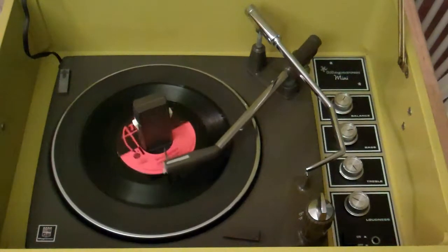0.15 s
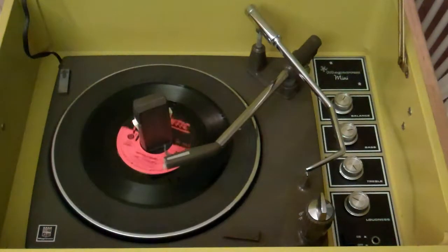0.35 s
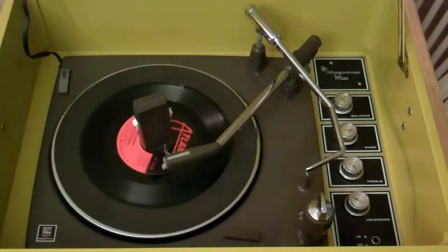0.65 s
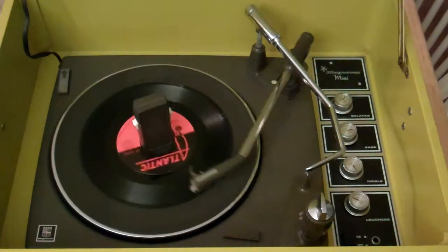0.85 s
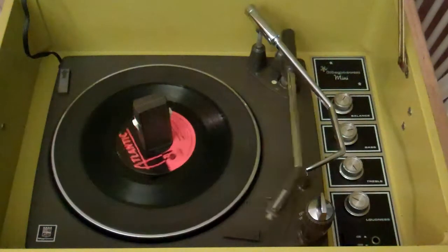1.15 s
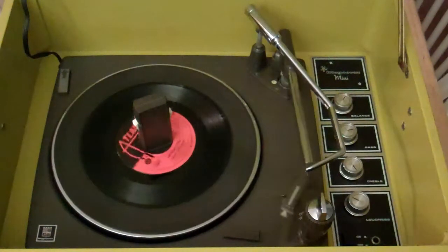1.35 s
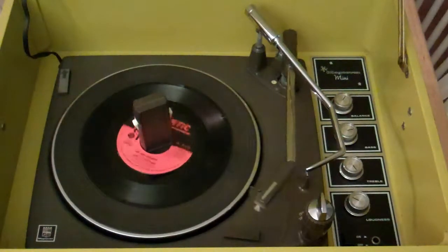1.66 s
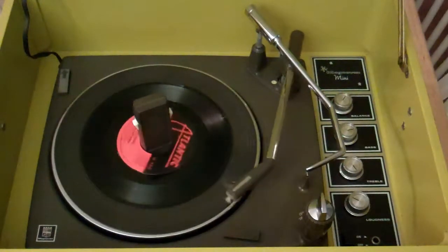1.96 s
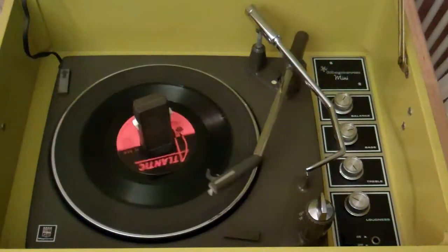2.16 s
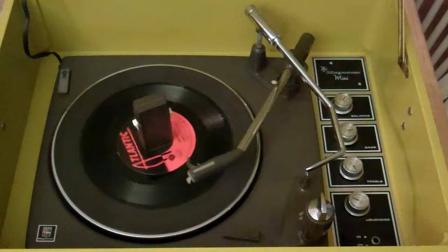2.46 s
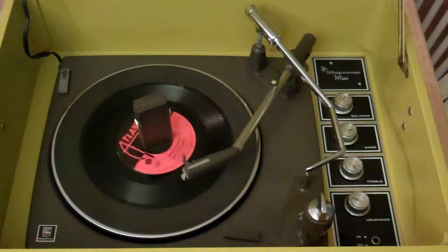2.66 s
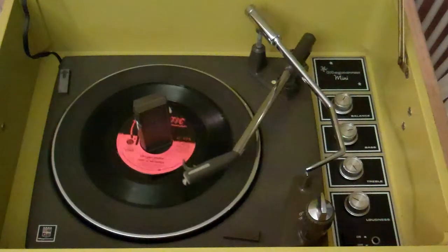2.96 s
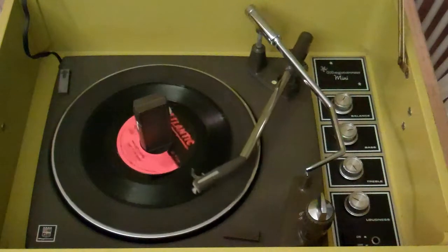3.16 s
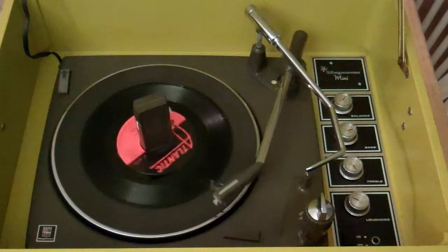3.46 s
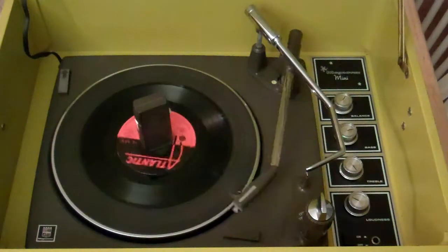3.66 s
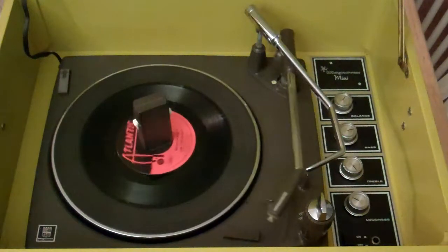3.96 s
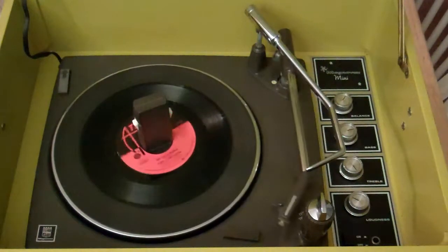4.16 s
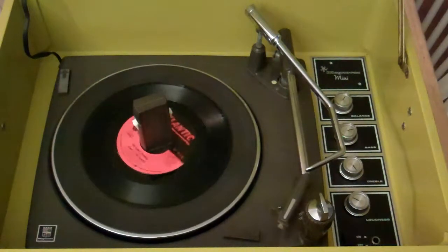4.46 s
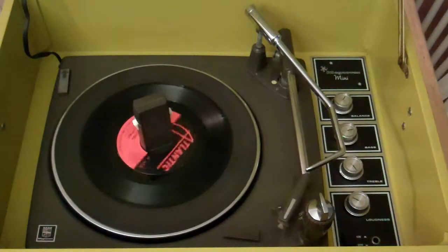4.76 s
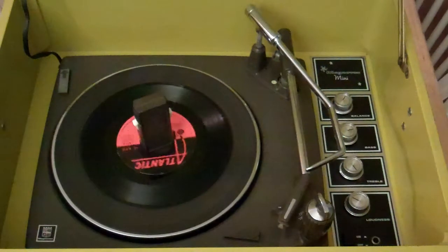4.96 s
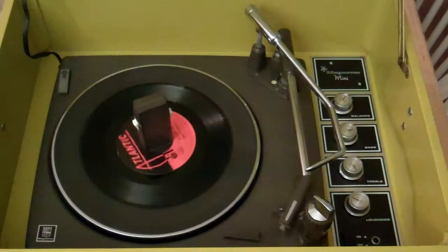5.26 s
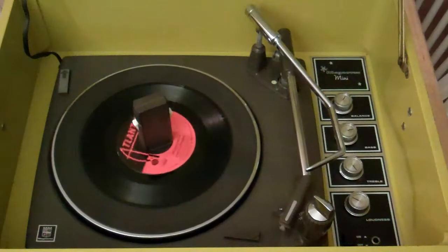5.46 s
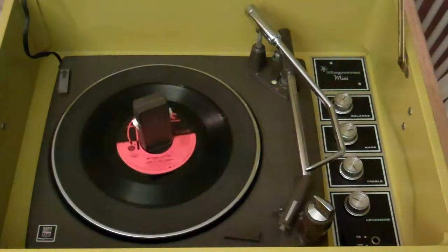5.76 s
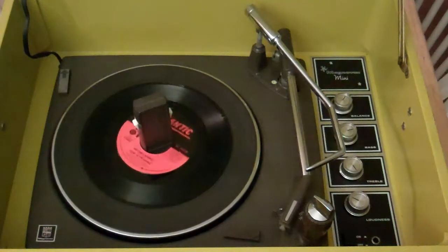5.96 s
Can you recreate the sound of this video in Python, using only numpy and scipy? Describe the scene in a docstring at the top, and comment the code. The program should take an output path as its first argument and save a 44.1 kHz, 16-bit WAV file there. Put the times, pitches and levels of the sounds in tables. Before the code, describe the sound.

Sharp mechanical clicks, soft bumps and a brief spring ring from a small record player's automatic arm, close up with light hiss.

```python
"""The changer of a small record player lifts its arm, swings it about and drops it on the rest.
Levers and pawls click under the steel deck, a spring lever rings, the cam bumps and the open case answers.
The motor hums until the switch trips, then the platter coasts with a soft rush.
Heard from close by on a camera's stereo microphone, which hisses and whines. The clicks sit to the left;
after five of the loud ones the background sinks and climbs back."""
import sys
import numpy as np
from scipy import signal
from scipy.fft import rfft, irfft, next_fast_len
from scipy.io import wavfile
from scipy.ndimage import map_coordinates

SR = 44100
rng = np.random.default_rng(int(sys.argv[2]) if len(sys.argv) > 2 else 0)


def inscribe(sig):
    """Save sig as 16-bit PCM at rate SR to the path in sys.argv[1].

    A 1-D sig is mono; a 2-D sig holds one channel per row.
    Samples are clipped to [-1, 1] before scaling.
    """
    pcm = np.round(np.clip(np.atleast_2d(sig).T, -1, 1) * 32767)
    wavfile.write(sys.argv[1], SR, pcm.astype(np.int16))


N = 269927


def amp(db):
    """Decibels as an amplitude factor."""
    return 10 ** (np.asarray(db) / 20)


def curve(points):
    """A function of frequency that joins (Hz, value) points on a log axis."""
    freqs, values = np.transpose(points)
    return lambda hz: np.interp(np.log(hz + 1), np.log(freqs + 1), values)


def wobble(rate):
    """A smooth random curve, rate knots a second."""
    return map_coordinates(rng.standard_normal(int(N * rate / SR) + 4), [np.arange(N) * rate / SR])


def filtered(x, response):
    """x shaped by a gain that depends on frequency."""
    n = x.shape[-1]
    size = next_fast_len(n + 8192)
    return irfft(rfft(x, size) * response(np.fft.rfftfreq(size, 1 / SR)), size)[..., :n]


def stereo_noise(n, spectrum_db, likeness, left_db):
    """Noise with mid rms 1, from spectrum, left-right likeness and balance as functions of frequency."""
    def mid_side_gains(hz):
        angle = np.arccos(np.clip(likeness(hz), -1, 1)) / 2
        return amp(spectrum_db(hz)) * [np.cos(angle), np.sin(angle)]

    mid, side = filtered(rng.standard_normal((2, n)), mid_side_gains)
    both = np.array([mid + side, mid - side])
    both = filtered(both, lambda hz: amp([left_db(hz) / 2, -left_db(hz) / 2]))
    return both / np.std(both.mean(0))


# The microphone's hiss. Each row: frequency in Hz, spectral level in dB.
HISS_SPECTRUM = [(18, -44), (30, 3), (143, -5.5), (180, -2.5), (238, -2.5), (417, -3), (474, -4),
                 (525, -3.5), (3400, -9), (3860, -9), (6770, -14), (10200, -21), (11900, -32), (13500, -51)]
# Its width. Each row: frequency in Hz, left-right likeness from 0 to 1.
HISS_LIKENESS = [(60, 0.08), (180, 0.33), (540, 0.22), (1630, 0.15), (4900, 0.088), (14700, 0.12)]
# Its balance. Each row: frequency in Hz, left over right in dB.
HISS_BALANCE = [(60, 0), (240, 0.5), (940, 1), (3720, 0.5), (14700, 3.5)]

def microphone():
    """Smooth, wide hiss and the thin whine of the camera's sensor, which starts afresh each frame."""
    whine_hz, frames_per_s = 7866, 29.97
    hiss = stereo_noise(N, curve(HISS_SPECTRUM), curve(HISS_LIKENESS), curve(HISS_BALANCE))
    frame_time = np.arange(N) / SR % (1 / frames_per_s)
    whine = np.sin(2 * np.pi * whine_hz * frame_time)
    return amp(3.5) * hiss + amp([[-9.4], [-8.4]]) * whine


# Idler and platter turning. Each row: frequency in Hz, spectral level in dB.
WHIRR_SPECTRUM = [(40, -14), (90, 5.5), (130, -2.5), (250, -0.5), (420, 0.5), (700, -13.5), (1200, -10.5),
                  (2500, -12), (5000, -46.5)]
# The motor's windings. Each row: frequency in Hz, level over the background in dB.
HUM_TONES = [(119.5, -8.5), (1105, -6.5), (1226, -14), (2386, -15)]

def motor(switch_off_s=4.45, decay_s=0.06):
    """An unevenly swelling whirr and a wavering hum, both dying quickly once the switch trips."""
    t = np.arange(N) / SR
    whirr = stereo_noise(N, curve(WHIRR_SPECTRUM), lambda hz: 0.75 + 0 * hz, lambda hz: 0.4 + 0 * hz)
    swells = amp(-5.5 + 1.7 * wobble(8.6) + 2.6 * wobble(29.77))
    hum = np.zeros(N)
    for hz, db in HUM_TONES:
        level = np.sqrt(2) * amp(db + 1.3 * wobble(5.8))
        drift = np.cumsum(2.5 * wobble(9)) / SR
        hum += level * np.sin(2 * np.pi * (hz * t + drift))
    running = np.exp(-np.maximum(t - switch_off_s, 0) / decay_s)
    return running * (swells * whirr + hum)


# Dips after loud clicks. Each row: start in seconds, depth in dB, hold in seconds, slow share from 0 to 1.
BACKGROUND_DIPS = [(0, 10.5, 0.081, 0.61), (2.91, 18.5, 0.013, 0.4), (4.21, 19, 0.016, 0.33),
                   (4.49, 9, 0.029, 0.13), (5.02, 17.5, 0.023, 0.44)]

def background_gain(resting_db=-62.5, sink_s=0.13, quick_s=0.081, slow_s=0.92):
    """In each dip the background sinks, stays down, then returns quickly at first and slowly after."""
    level_db = np.full(N, resting_db)
    for start, depth_db, hold_s, slow_share in BACKGROUND_DIPS:
        t = np.arange(N) / SR - start
        sinking = np.sin(np.pi / 2 * np.clip(t / sink_s, 0, 1))
        back = np.maximum(t - sink_s - hold_s, 0)
        remaining = (1 - slow_share) * np.exp(-back / quick_s) + slow_share * np.exp(-back / slow_s)
        level_db -= depth_db * sinking * remaining
    return amp(level_db)


# Width of rubs and clicks at the microphone. Each row: frequency in Hz, left-right likeness from 0 to 1.
MECHANISM_LIKENESS = [(120, .6), (300, 1), (2000, 0.97), (4000, 0.89), (7400, 0.58), (10000, 0.52),
                      (12000, .05)]
# Lean of rubs, rings and clicks. Each row: frequency in Hz, left over right in dB per unit of lean.
MECHANISM_LEAN = [(300, 0.1), (2000, 0.2), (4500, 0.47), (8500, 2), (10500, 4), (12000, -0.5)]
# Parts sliding on each other. Each row: frequency in Hz, spectral level in dB.
FRICTION_SPECTRUM = [(100, -11), (250, -2), (1000, -3), (3000, -7.5), (6000, -11.5), (11000, -15),
                     (13000, -60)]

def friction():
    """A grainy rub, slightly left of centre."""
    noise = stereo_noise(N, curve(FRICTION_SPECTRUM), curve(MECHANISM_LIKENESS), curve(MECHANISM_LEAN))
    return amp(2.1 * wobble(150)) * noise


def platter_coast(start_s=5.3, end_s=5.87):
    """A soft rub sets in, then fades with the platter's speed."""
    t = np.arange(N) / SR
    onset = np.clip((t - start_s) / 0.09, 0, 1)
    speed = np.clip((end_s - t) / (end_s - start_s), 0, 1)
    return amp(3.7) * onset * np.sqrt(speed) * friction()


def lever_drag(trip_s=5.014, swell_s=0.07, end_db=-56.5):
    """A lever rubs ever louder until it trips."""
    t = np.arange(N) / SR - trip_s
    return amp(end_db) * np.exp(np.minimum(t, 0) / swell_s) * (t < 0) * friction()


# The space inside the player's case. Each row: frequency in Hz, time to fall 60 dB in seconds.
CASE_DECAY = [(200, 0.27), (2000, 0.25), (10000, 0.19)]

def case_reverb(x):
    """The open case answers briefly, each frequency dying at its own speed."""
    hz, t, spectra = signal.stft(rng.standard_normal((2, SR // 4)), SR, nperseg=256)
    t60 = curve(CASE_DECAY)(hz)[:, None]
    tail = signal.istft(spectra * amp(-60 * t / t60), SR, nperseg=256)[1]
    delayed = np.pad(x, ((0, 0), (200, 0)))
    return signal.fftconvolve(delayed, tail / np.linalg.norm(tail[0]), axes=1)[:, :N]


# Cam bumps and thuds down in the deck. Each row: start in seconds, relative level in dB, pitch in Hz.
CAM_BUMPS = [(0, -49, 150), (0.212, -61, 90), (0.906, -59, 98), (1.47, -53, 96.9), (1.642, -54, 100),
             (2.06, -54.5, 92), (2.238, -58, 107), (2.543, -55, 92.5), (2.749, -59, 113), (2.905, -57, 132),
             (3.234, -62, 91.5), (3.406, -61, 94.2), (3.797, -57.5, 86.5), (4.205, -65.5, 90),
             (5.005, -62, 120)]

def cam(rise_s=0.0033, t60=0.11):
    """Each bump is a soft low push of a few cycles."""
    out, t = np.zeros(N + SR), np.arange(SR // 5) / SR
    envelope = (1 - np.exp(-t / rise_s)) * amp(-60 * t / t60)
    for start, db, hz in CAM_BUMPS:
        out[round(start * SR):][:len(t)] += amp(db + 5) * envelope * np.sin(2 * np.pi * hz * t)
    return out[:N]


# The steel spring lever. Each row: mode frequency in Hz, relative level in dB, 60 dB decay in seconds.
SPRING_MODES = [(700, -4, .06), (1039, -10, .16), (1211, -6, .18), (1570, 3, .06), (2369, -9, .13),
                (3112, -13, .2), (4000, -24, .55), (4054, 8, .07), (4040, -16, .45), (5375, -17, .3),
                (5426, -9, .3), (6944, -12, .38), (6990, -15, .2), (7407, -14, .22), (9776, -16, .18),
                (10650, -19, .18)]
# The arm's tube. Each row: mode frequency in Hz, relative level in dB, 60 dB decay in seconds.
ARM_MODES = [(490, -7, .14), (875, -8, .2), (2536, -10, .08), (4759, 2, .09), (6977, -2, .13),
             (7050, -6, .1), (7429, -8, .08), (9830, 2, .07)]

def struck_part(modes, start_s, gain_db, rise_s=0.0018, lean=2.4):
    """The modes build up just after the blow; close pairs beat and loose joints roughen the ring."""
    t = np.maximum(np.arange(N) / SR - start_s, 0)
    ring = np.zeros((2, N))
    for hz, db, t60 in modes:
        left_db = lean * curve(MECHANISM_LEAN)(hz)
        envelope = amp(db + 3.3 * wobble(70) - 60 * t / t60)
        ring += amp([[left_db / 2], [-left_db / 2]]) * envelope * np.sin(2 * np.pi * hz * t)
    return amp(gain_db) * (1 - np.exp(-t / rise_s)) * ring


# The bare crack of a contact. Each row: frequency in Hz, spectral level in dB.
CRACK_SPECTRUM = [(110, -33.5), (240, 2.5), (650, 0), (1200, 2.5), (2600, 2.5), (5000, 3), (7000, 2),
                  (10200, -3), (11300, -11), (12500, -13.5), (14000, -25.5), (15300, -50.5)]
# The steel deck, heard in every click. Each row: centre in Hz, half-width in Hz, lift in dB.
DECK_RESONANCES = [(403, 68, 5.5), (660, 45, 7.5), (835, 48, 2), (1142, 63, 6), (1976, 76, 2.5),
                   (2694, 100, 4.5), (3920, 250, 3.5), (4700, 120, 0), (7000, 210, 4), (7590, 250, 3.5),
                   (9180, 450, 3)]

def crack(n, body_db, edge_db, tone_hz, lift_db):
    """The noise of one click, dull or sharp, coloured by the deck and a resonance of the struck part."""
    shelves = [(1000, body_db + 6.5), (1550, 0.13 * body_db), (2700, 0.013), (4600, 0.011),
               (5700, edge_db)]
    resonances = [*DECK_RESONANCES, (tone_hz, 75 + 0.025 * tone_hz, lift_db)]

    def spectrum_db(hz):
        peaks = sum(db / (1 + ((hz - centre) / width) ** 2) for centre, width, db in resonances)
        return curve(CRACK_SPECTRUM)(hz) + curve(shelves)(hz) + peaks

    lean = 3.5 + 0.26 * edge_db  # sharp clicks lean further left
    return stereo_noise(n, spectrum_db, curve(MECHANISM_LIKENESS),
                        lambda hz: lean * curve(MECHANISM_LEAN)(hz))


# Levers and pawls, close to the microphone. Each row: start in seconds, relative level, low body and
# treble edge in dB, rise in milliseconds, 60 dB decay in seconds, the part's tone in Hz, its lift in dB.
LINKAGE_CLICKS = [(0.0, -36.5, -1.5, 5.5, .2, 0.045, 3050, 15),
                  (0.0713, -50.5, -7.5, -11, 1.5, 0.063, 2470, 10),
                  (0.114, -56, -6, -21, 1.5, 0.062, 2000, 16), (.2992, -44, -8, -26, .9, 0.072, 2280, 13.5),
                  (0.3096, -44.5, -4, -1.5, 2.7, .058, 5500, 8), (.697, -58.5, 1, -17, 3, 0.074, 2000, 5),
                  (0.7602, -39.5, -7, -11, 3, 0.081, 1440, 9),
                  (0.8051, -43, -3, -9.5, 4.2, 0.051, 7160, 19), (0.8867, -53.5, 1, -17, .9, .1, 1740, 13),
                  (0.9336, -51, -2.5, -17, 2.8, .22, 634, 15), (0.9718, -53.5, 9, -6, 3.3, 0.093, 770, 10),
                  (0.9829, -49.5, -6, -2, 1, .073, 626, 15), (1.0719, -40.5, -28, -5, 3.1, 0.068, 3620, 11),
                  (1.27, -50, -10, -13, 2.4, 0.056, 3800, 10), (1.3187, -44, -5.5, 0, 2.8, 0.057, 1375, 11),
                  (1.481, -30, -24, 3.5, 2.1, 0.054, 3880, 15),
                  (1.6484, -43, -16, 0.5, 3.5, 0.067, 3950, 13.5),
                  (2.1047, -55.5, -18, -1, 2.5, 0.073, 5610, 10), (2.161, -52.5, -6, -4, 3.4, 0.1, 2370, 7),
                  (2.1906, -36.5, -45, -6, 3, 0.051, 5510, 14),
                  (2.3951, -50.5, 0, -10.5, 1.3, 0.1, 1780, 15), (2.444, -54.5, -14, -8, 1.3, 0.1, 2350, 9),
                  (2.5036, -54, -3, -10, 1.8, .06, 3700, 12), (2.5394, -47, -5, -8.5, 2.5, 0.16, 690, 11),
                  (2.58, -44.5, -1, 4, 1, 0.026, 3950, 12), (2.7304, -49.5, -14, -8, 1.3, 0.077, 3030, 16),
                  (2.9073, -33.5, -6, -6, 3.1, 0.032, 1540, 13.5),
                  (2.9092, -21, -15, -3, .6, 0.048, 5400, 12), (3.3229, -56, -4, -10, 2.9, 0.13, 475, 8),
                  (3.5205, -52.5, -4, -10, 1.5, 0.093, 2150, 8),
                  (4.0627, -52, -19, -8.5, 1.7, 0.18, 1730, 9), (4.1063, -42.5, -5, -11, 2.7, 0.09, 670, 8),
                  (4.115, -46, 2, 1.5, 1.1, 0.044, 7630, 17), (4.1253, -43.5, 0, -13.5, .6, 0.24, 510, 12),
                  (4.138, -33, -3, -7, 5.8, .093, 1920, 11.5),
                  (4.164, -36.5, -3.5, -16.5, 1.1, 0.067, 1970, 12),
                  (4.1813, -33.5, -4, -12, 1.5, 0.084, 2490, 11.5),
                  (4.209, -26.5, -13, 1.5, 2.1, 0.04, 7070, 7.5),
                  (4.426, -47, -17, -2.5, 5.1, 0.067, 2080, 11),
                  (4.4527, -29, -13.5, 8, 2.9, 0.042, 4800, 15),
                  (4.4585, -32, -9, -7, 2.1, 0.085, 3900, 9.5),
                  (4.4846, -48.5, 0, -3.5, 4.9, 0.17, 4500, 0),
                  (4.4885, -28, -13.5, 2.5, 1.2, 0.06, 4060, 6), (4.739, -46, -18, 5, 2.7, 0.06, 3900, 15),
                  (4.8607, -40, -24, -2, 2.5, 0.066, 4120, 16.5),
                  (4.8968, -46, -11, -4, 1.8, .044, 3920, 17),
                  (5.0131, -23.5, -23, 1.5, 3.6, 0.028, 3880, 8.5),
                  (5.0208, -33, -14.5, -0.5, 4.7, 0.11, 2070, 2),
                  (5.1087, -52, -10.5, 0.5, 1.9, 0.066, 2885, 7), (5.911, -61, 1, 9, 3.4, 0.091, 6750, 19)]

def linkage():
    """Levers and pawls strike under the deck, each with a short rattling crack."""
    out, t = np.zeros((2, N + SR)), np.arange(SR // 4) / SR
    for start, db, body_db, edge_db, rise_ms, t60, tone_hz, lift_db in LINKAGE_CLICKS:
        rise_s = rise_ms / 1000
        noise = crack(len(t), body_db, edge_db, tone_hz, lift_db)
        knots = rng.standard_normal(200)
        rattle = amp(0.78 * np.interp(t * 550, np.arange(200), knots))  # loose parts touch repeatedly
        envelope = np.minimum(t / rise_s, 1) * amp(-60 * np.maximum(t - rise_s, 0) / t60)
        contact = 1 + 0.17 * np.exp(-((t - rise_s) / 0.00046) ** 2)  # a spike at the hard contact
        out[:, round(start * SR):][:, :len(t)] += amp(db - 2) * noise * rattle * envelope * contact
    return out[:, :N]


def scene():
    """The changer's clicks and bumps up close, over the sinking and climbing background."""
    clicks = linkage()
    clicks += struck_part(SPRING_MODES, start_s=2.91, gain_db=-44.5)  # the spring lever snaps over
    clicks += struck_part(ARM_MODES, start_s=4.21, gain_db=-47)  # the arm lands on its rest
    changer = clicks + amp(-16.5) * case_reverb(clicks) + cam() + lever_drag()
    return changer + background_gain() * (microphone() + motor() + platter_coast())


def record(dry):
    """The camera keeps nothing above its band limit."""
    return filtered(dry, lambda hz: hz < 15342)


dry = scene()
out = record(dry)
inscribe(out)
```